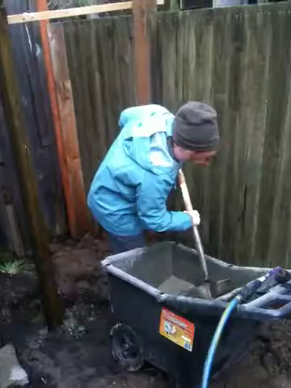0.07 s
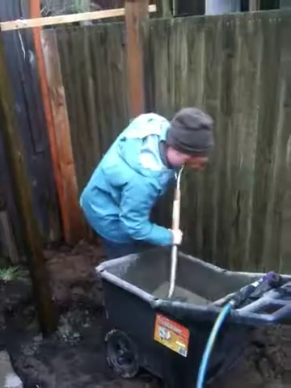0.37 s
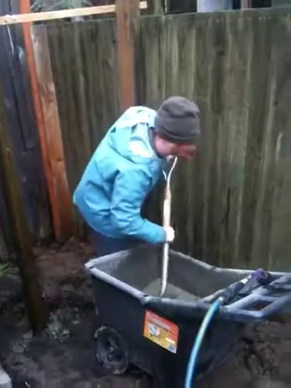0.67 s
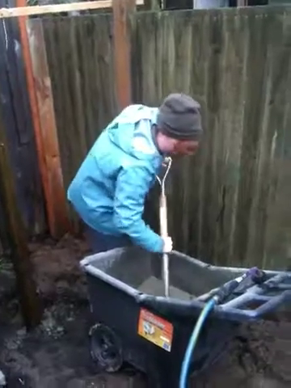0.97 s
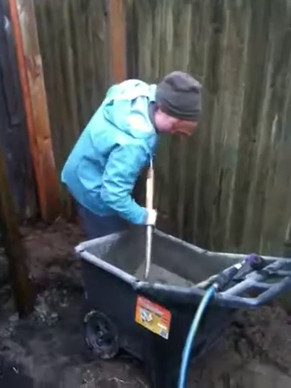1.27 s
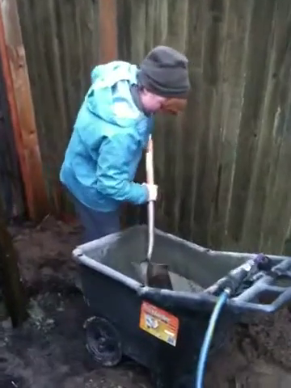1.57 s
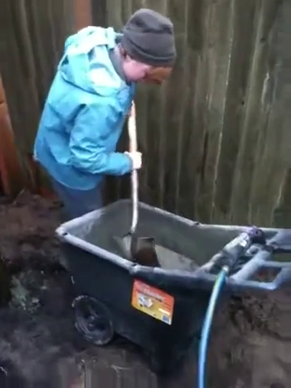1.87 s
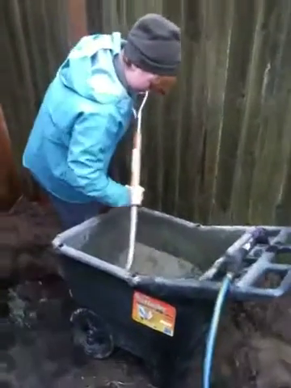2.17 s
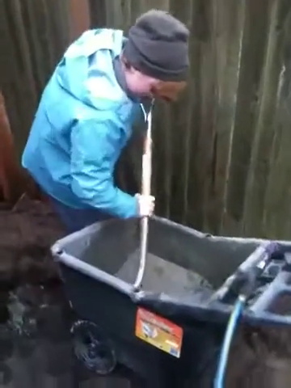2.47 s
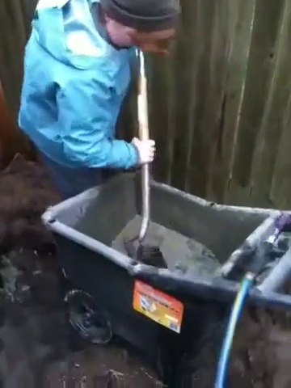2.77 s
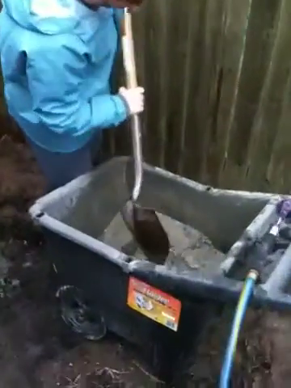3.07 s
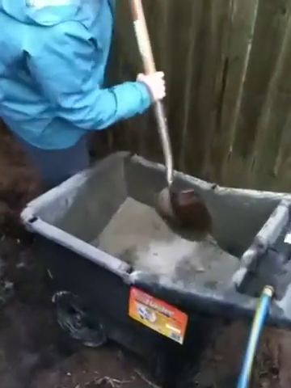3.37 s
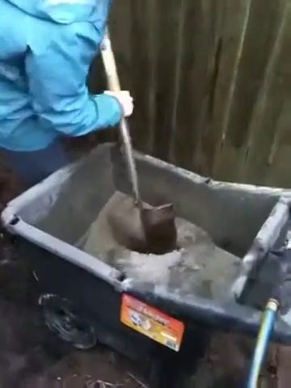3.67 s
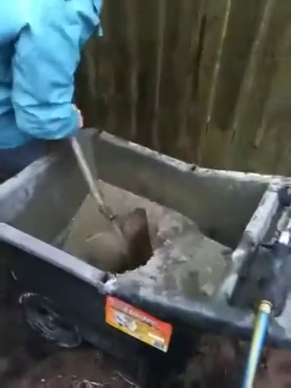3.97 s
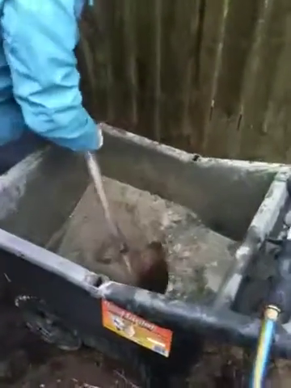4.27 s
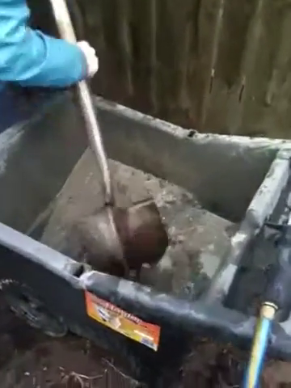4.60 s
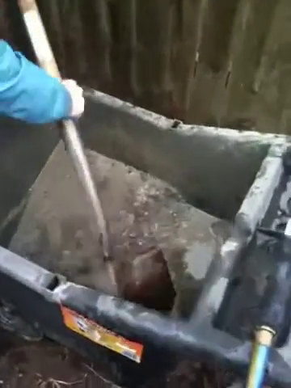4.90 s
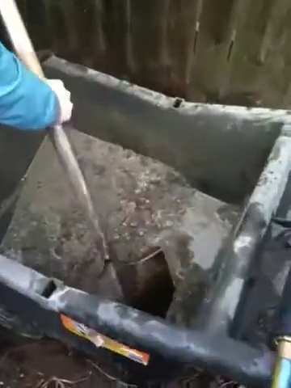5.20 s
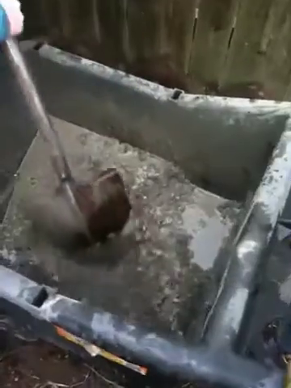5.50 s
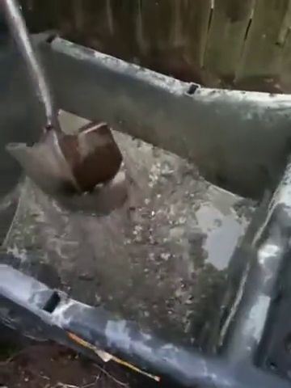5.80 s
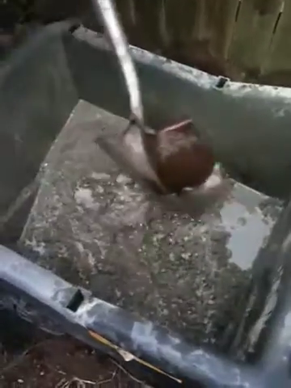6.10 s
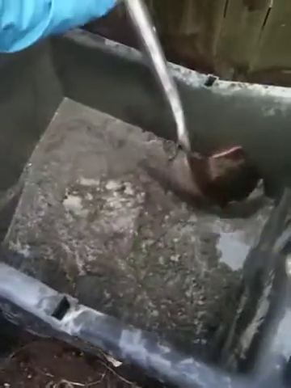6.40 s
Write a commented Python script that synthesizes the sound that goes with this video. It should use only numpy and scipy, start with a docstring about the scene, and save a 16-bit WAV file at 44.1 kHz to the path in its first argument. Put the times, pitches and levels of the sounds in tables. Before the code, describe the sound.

A steel shovel mixes wet cement in a plastic cart, heard nearby through a phone microphone over faint, steady outdoor noise. From the start, deep uneven strokes grind and hiss through sand and gravel, with stone clicks, damped steel ringing and a low tub rumble. Dull thuds come around 0.7 seconds, and tiny metal squeaks near 0.9 and 1.5 seconds. At about 2 seconds cement slides along the blade with a hollow swish, followed by more crunching scrapes until 2.7. After a lull with soft bumps, shallower, hissier strokes run from 3.3 to 4.7 seconds, separated by short gaps. At 5 seconds the blade hits the tub with a hard, rattling knock, the loudest moment, shaking sand loose. A long skimming scrape follows from 5.2 to 5.7, then a short one, and a last sharp, bright bite into gravel at 6.3 seconds.

```python
"""A steel shovel mixes wet cement in a plastic cart by a wooden fence; a phone hears it over yard noise.
First the blade works deep: sand grinds, hisses, rings the steel and rumbles in the tub. The edge bites
gravel, squeaks by stick-slip and thuds on the tub. Near 2 s cement slides along the steel with a swish.
From 3 s the strokes run shallower. At 5 s the blade knocks hard on the tub and shakes sand loose.
A long skimming stroke follows, then a last sharp bite at 6.3 s."""
import sys
import numpy as np
from scipy import signal
from scipy.fft import rfft, irfft
from scipy.io import wavfile
from scipy.ndimage import uniform_filter1d, map_coordinates

SR = 44100
rng = np.random.default_rng(int(sys.argv[2]) if len(sys.argv) > 2 else 0)


def store_wav(level_fs):
    """Save 16-bit WAV to argv[1]."""
    pcm = np.round(np.clip(np.atleast_2d(level_fs), -1, 1) * 32767)
    wavfile.write(sys.argv[1], SR, pcm.T.astype(np.int16))


N = 284445
TIME_S = np.arange(N) / SR

# shovel pushes: (start [s], push [s], release [s], blade drive [dB], sand [dB re blade], tub [dB re blade])
STROKES = [ (0.1, 0.086, .06, -46.5, -0.5, -14), (0.159, .21, 0.061, -33, -3, -14.5),
           (0.48, 0.11, 0.1, -44.5, -2, -13), (0.65, 0.13, 0.04, -41, -13, -5),
           (1.116, 0.09, 0.023, -33, -6.5, -13.5), (1.19, 0.18, 0.056, -32.5, -1.5, -13),
           (1.42, 0.12, 0.076, -39.5, -1, -20), (2.039, 0.27, 0.051, -35.5, -3.5, -3.5),
           (2.39, 0.15, 0.059, -41, -6, -8.5), (2.54, 0.1, 0.099, -34, -0.5, -12.5),
           (2.98, 0.13, 0.038, -47.5, -1.5, -20), (3.31, 0.073, .02, -59.5, 10, -16),
           (3.41, 0.038, 0.29, -35.5, 1, -12.5), (3.585, 0.11, 0.26, -34.5, -2, -17.5),
           (4.02, 0.051, 0.16, -36.5, 3.5, -10.5), (4.19, 0.15, 0.064, -36.5, -9.5, -12.5),
           (4.474, 0.16, 0.022, -35.5, -0.5, -21), (5.23, 0.39, 0.15, -34, -4, -18.5),
           (5.835, 0.094, 0.005, -36, -3.5, -33), (6.283, 0.11, 0.035, -33, -2, -17.5)]
# edge bites gravel: (peak [s], rise [s], blade drive [dB], sand [dB re blade], tub [dB re blade])
BITES = [ (0.336, 0.037, -25.5, 2.5, -20), (0.738, 0.022, -21.5, -9, -13),
         (0.947, 0.013, -24.5, -3.5, -10.5), (2.117, 0.005, -25.5, -2, -9), (2.13, 0.0076, -24, 2, -10),
         (2.316, 0.0078, -28.5, -12, -28), (2.345, .01, -26, -10, -17), (2.517, 0.024, -31.5, -2, -10),
         (2.577, 0.0093, -35.5, 1.5, 2), (3.427, 0.0037, -32.5, 5.5, -10), (3.471, 0.023, -42.5, 14.5, -7),
         (3.588, 0.0031, -32, 11.5, -11), (4.228, 0.012, -25, -5, -13.5), (4.294, 0.011, -36, 4, -4),
         (4.601, 0.009, -27, -8, -35), (5.077, 0.018, -24, 1.5, -9), (5.156, 0.0099, -37.5, 0, -20),
         (5.227, 0.02, -35, 0.5, -7), (6.291, 0.0021, -19, 4.5, -34), (6.305, 0.003, -17, 0, -17.5),
         (6.332, 0.0061, -23, -1, -18)]
# drive between pushes: (blade [dB], sand [dB], tub [dB])
REST_DRIVE_DB = (-57.5, -62, -66.5)
# blade depth in the mix: (time [s], depth [0 skimming, 1 buried])
BLADE_DEPTH = [(.3, 0.73), (1.4, 0.83), (2.65, 0.84), (3.5, 0.33), (5.6, 0.063), (6.3, 0.38)]
# blows on stone or tub: (time [s], rattle decay [s], blade drive [dB], click drive [dB], tub drive [dB])
KNOCKS = [ (0.177, 0.017, -40, -31.5, -68), (0.682, 0.022, -29, -60, -70), (0.897, 0.0068, -34, -70, -69),
          (1.524, .009, -28.5, -39, -58), (2.453, .007, -31, -38, -50), (4.463, 0.01, -33, -69, -64),
          (4.933, 0.0083, -17.5, -47, -38), (4.979, 0.02, -17, -27, -23.5), (4.992, 0.008, -14.5, -27, -24),
          (5.0135, 0.005, -19, -42, -26), (5.0335, 0.012, -22.5, -34, -24.5), (5.268, 0.014, -31, -50, -39)]
# sharp bright clicks from stones on the edge and from the hard knock: (time [s], drive [dB])
BRIGHT_CLICKS = [(.331, -21), (2.52, -21), (3.585, -22), (4.932, -24), (4.979, -7), (6.307, -8)]
# blade stick-slip: (time [s], pitch [Hz], fade [s], level [dB])
SQUEAKS = [(0.897, 3310, 0.008, -39), (0.92, 3230, .007, -29), (0.943, 2830, 0.008, -22.5),
           (1.499, 1860, .01, -33), (1.528, 1905, 0.02, -27.5), (3.05, 3240, 0.094, -47.5)]
# blade or wet lump bumps the tub: (time [s], pitch [Hz], decay [s], level [dB])
THUDS = [(.717, 305, 0.0034, -25.5), (0.768, 300, 0.0029, -25), (.945, 104, .008, -52),
         (1.273, 236, 0.0051, -39), (2.134, 137, .005, -34.5), (2.791, 294, 0.0046, -41.5),
         (2.934, 222, 0.0015, -34)]
# plastic tub modes: (frequency [Hz], level [dB], t60 [s])
TUB_MODES = [(118, -12, .25), (183, 0, .26), (259, -.5, .16), (361, -2, .3), (431, -6, .25), (549, -9, .28),
             (734, -6, .24), (838, -6, .25)]
# free steel blade modes: (frequency [Hz], level [dB], t60 [s])
BLADE_MODES = [(958, 0, .2), (1125, 0, .14), (1195, -5, .3), (1260, 0, .3), (1430, -5, .2), (1680, 3, .18),
               (2040, -6, .2), (3300, -6, .06), (4750, -4, .06)]
# broad blade resonances while scraping: (frequency [Hz], buried [dB], skimming [dB])
SCRAPE_RESONANCES = [(1052, -28, -10.5), (1440, -6.5, -17.5), (1642, -9, -11.5), (1930, -5.5, -16),
                     (2830, -10, -15), (3130, 0, -33), (4700, -28, -6.5)]
# distant outdoor noise: (frequency [Hz], level [dB])
YARD_SPECTRUM = [(25, -36), (70, -2), (130, -1), (230, 5.5), (450, -4.5), (900, -2), (2000, -9),
                 (5000, -25.5), (16000, -19)]
# tub rumble: (frequency [Hz], level [dB])
RUMBLE_SPECTRUM = [(30, 0.5), (90, -24.5), (180, 0.5), (320, -2.5), (600, -2.5), (1100, -7.5), (3000, -87)]
# blade grinding: (frequency [Hz], level [dB])
GRIND_SPECTRUM = [(200, -37.5), (550, -9), (900, 1.5), (1600, 5), (2200, -1), (3200, 0.5), (6000, -16.5)]
# sand hiss: (frequency [Hz], level [dB])
HISS_SPECTRUM = [(900, -28.5), (2000, -4), (3000, 5.5), (8000, 1.5), (16000, -9.5)]
# cement slipping on steel: (frequency [Hz], level [dB])
SWISH_SPECTRUM = [(300, -3.5), (900, -6), (1500, 1.5), (2050, 7), (3000, 5), (4200, 2), (11000, 1),
                  (16000, -1.5)]
# microphone bass roll-off and port resonances: (frequency [Hz], gain [dB])
MIC_RESPONSE = [(35, -22.5), (120, 0), (1150, -3.5), (1520, -1.5), (2080, 3.5), (2370, -5), (3200, -9.5),
                (3900, -8), (4850, -4.5), (5850, -13), (7600, -0.5), (9500, -9), (11300, -5.5),
                (12900, -15), (14200, -10.5), (16000, -23)]


def undb(db):
    """Decibels to gain."""
    return 10 ** (np.asarray(db) / 20)


def unit_rms(x):
    """Scale to rms 1."""
    return x / np.sqrt(np.mean(x ** 2))


def unit_energy(response):
    """Scale to energy 1."""
    return response / np.sqrt(np.sum(response ** 2))


def convolve(x, response):
    """Apply an impulse response."""
    return signal.fftconvolve(x, response)[:N]


def colour(spectrum, size=2048):
    """Minimum-phase impulse response of a spectrum."""
    hz, db = np.transpose(spectrum)
    bins_hz = np.maximum(np.arange(size // 2 + 1) * SR / size, 1)
    cepstrum = irfft(np.log(undb(np.interp(np.log(bins_hz), np.log(hz), db))))
    cepstrum[1:size // 2] *= 2
    cepstrum[size // 2 + 1:] = 0
    return irfft(np.exp(rfft(cepstrum)))


def shaped(x, spectrum):
    """Filter by a spectrum at unit energy."""
    return convolve(x, unit_energy(colour(spectrum)))


def walk(rate_hz):
    """Smooth random drift, spread near 1."""
    hold = max(int(SR / rate_hz), 1)
    steps = np.repeat(rng.standard_normal(N // hold + 1), hold)
    return 1.2 * uniform_filter1d(steps, hold)[:N]


def grit(per_s, spread_db):
    """Grains cracking under steel: random clicks of uneven size."""
    clicks = (rng.random(N) < per_s / SR) * np.sign(rng.standard_normal(N))
    return unit_rms(clicks * undb(spread_db * rng.standard_normal(N)))


def swell(at_s, rise_s, fall_s):
    """Force with exponential rise and fall."""
    return np.exp(-np.maximum((at_s - TIME_S) / rise_s, (TIME_S - at_s) / fall_s))


def ringing(modes, damping=1):
    """Impulse response of decaying modes."""
    t = TIME_S[:SR // 2]
    ring = 0
    for k, (hz, db, t60_s) in enumerate(modes):
        decay = np.exp(-np.log(1000) * damping * t / t60_s)
        ring += (-1) ** k * undb(db) * np.cos(2 * np.pi * hz * t) * decay
    return unit_energy(ring)


def yard(level_db=-53, wander_db=2.5):
    """Distant outdoor noise, level drifting."""
    noise = unit_rms(shaped(rng.standard_normal(N), YARD_SPECTRUM))
    return noise * undb(level_db + wander_db * walk(rate_hz=4.38))


def fence(x, t60_s=0.19, wet_db=-12, lag_s=0.0026):
    """Add scattered echoes from tub walls and fence boards."""
    t = TIME_S[:SR // 2]
    echoes = rng.standard_normal(len(t)) * (t > lag_s) * np.exp(-np.log(1000) * t / t60_s)
    return x + undb(wet_db) * convolve(x, unit_energy(echoes))


def thudding(overtone_ratio=1.505, overtone_db=-8):
    """Soft blows on the tub: two wall modes, smothered by cement within a few cycles."""
    thuds = 0
    for at_s, hz, decay_s, db in THUDS:
        age_s = np.maximum(TIME_S - at_s, 0)
        phase = 2 * np.pi * hz * age_s
        modes = np.sin(phase) + undb(overtone_db) * np.sin(overtone_ratio * phase)
        thuds += undb(db) * age_s / decay_s * np.exp(1 - age_s / decay_s) * modes
    return thuds


def squeaking(pitch_waver=0.0357):
    """Stick-slip bursts of unsteady pitch: quick catch, slower fade."""
    clock_s = np.cumsum(1 + pitch_waver * walk(rate_hz=360)) / SR
    squeaks = 0
    for at_s, hz, fade_s, db in SQUEAKS:
        envelope = np.exp(-(np.maximum(4 * (at_s - TIME_S), TIME_S - at_s) / fade_s) ** 2)
        squeaks += undb(db) * envelope * np.sin(2 * np.pi * hz * clock_s)
    return squeaks


def sliding(level_db=-28.5, at_s=1.945, rise_s=.055, fall_s=.095, sink_per_s=.3):
    """Cement slips along the steel: a hollow swish with broad, evenly spaced humps, sinking slightly."""
    dip_hz, spacing_hz = 2520, 3350
    hz = np.arange(N // 2 + 1) * SR / N
    humps = np.hypot(np.sin(np.pi * (hz - dip_hz) / spacing_hz), .1)
    swish = irfft(rfft(shaped(rng.standard_normal(N), SWISH_SPECTRUM)) * humps, N)
    age_s = TIME_S - at_s
    sinking = map_coordinates(swish, [(TIME_S - sink_per_s * age_s ** 2 / 2) * SR])
    envelope = np.exp(-(age_s / np.where(age_s < 0, rise_s, fall_s)) ** 2)
    return undb(level_db) * envelope * sinking / np.std(swish)


def knocking(blade_db=-2, click_db=4, tub_db=-1, blade_ring_db=4.5, tub_ring_db=2.5):
    """Steel hits with a short rattle; the share reaching the tub rings both tub and blade."""
    force = sum(undb(db)[:, None] * swell(at_s, 0.00048, fall_s) for at_s, fall_s, *db in KNOCKS)
    blade, click, tub = force * grit(per_s=6000, spread_db=2)
    blows = np.zeros(N)
    for at_s, fall_s, _, _, db in KNOCKS:
        blows[int(at_s * SR)] = undb(db) * np.sqrt(fall_s * SR / 2)  # energy of the tub's rattle
    clank = undb(blade_db) * shaped(blade, GRIND_SPECTRUM)
    clank += undb(blade_ring_db) * convolve(blows, ringing(BLADE_MODES))
    thump = undb(tub_db) * shaped(tub, RUMBLE_SPECTRUM)
    thump += undb(tub_ring_db) * convolve(blows, ringing(TUB_MODES))
    return clank + thump + undb(click_db) * shaped(click, HISS_SPECTRUM)


def depth():
    """Blade depth over time, 0 to 1."""
    return np.interp(TIME_S, *np.transpose(BLADE_DEPTH))


def push(start_s, length_s, release_s, attack_share=0.53):
    """Force of one stroke: build, hold, release."""
    age_s = np.maximum(TIME_S - start_s, 0)
    attack = np.sin(np.pi / 2 * np.minimum(age_s / (attack_share * length_s), 1))
    return attack * np.exp(-np.maximum(age_s - length_s, 0) / release_s)


def effort(bite_fall_s=0.011, shake_db=-11, shake_rise_s=0.00062, shake_fall_s=0.11):
    """Blade, sand and tub drives: power sum of strokes, bites and sand shaken by the hardest knock."""
    forces = [(push(*stroke[:3]), *stroke[3:]) for stroke in STROKES]
    forces += [(swell(at_s, rise_s, bite_fall_s), *db) for at_s, rise_s, *db in BITES]
    at_s, _, blade_db, click_db, tub_db = max(KNOCKS, key=lambda knock: knock[2])
    shake = swell(at_s, shake_rise_s, shake_fall_s)
    forces.append((shake, blade_db + shake_db, click_db - blade_db, tub_db - blade_db))
    power = sum((undb([db, db + sand, db + tub])[:, None] * force) ** 2 for force, db, sand, tub in forces)
    return np.sqrt(power + undb(REST_DRIVE_DB)[:, None] ** 2)


def judder():
    """The blade catches and slips: lurches growing with depth, plus fast chatter."""
    lurch_db = (1 + depth()) * walk(rate_hz=45)
    chatter_db = 1.3 * walk(rate_hz=200)
    return undb(lurch_db + chatter_db)


def ticking(drive, tick_db=2.5, highpass_hz=8500, click_rise_s=0.00027, click_fall_s=0.0058):
    """Small stones tick on the steel, louder with depth; stones and the hard knock add bright clicks."""
    ticks = undb(tick_db) * drive * np.sqrt(depth()) * grit(per_s=350, spread_db=3)
    force = sum(undb(db) * swell(at_s, click_rise_s, click_fall_s) for at_s, db in BRIGHT_CLICKS)
    clicks = force * grit(per_s=6000, spread_db=3)
    return signal.sosfilt(signal.butter(2, highpass_hz, "high", fs=SR, output="sos"), ticks + clicks)


def singing(grains, relative_width=.12, flicker_db=2, warp_s=.001):
    """Grains excite blade resonances; depth sets their balance, clinging cement shifts their pitch."""
    t = TIME_S[:SR // 20]
    buried, steel = depth(), 0
    for hz, buried_db, skimming_db in SCRAPE_RESONANCES:
        gain = undb(buried * buried_db + (1 - buried) * skimming_db + flicker_db * walk(rate_hz=30))
        resonance = t * np.exp(-np.pi * relative_width * hz * t) * np.sin(2 * np.pi * hz * t)
        band = convolve(gain * grains, unit_energy(resonance))
        steel += np.interp(TIME_S + warp_s * walk(rate_hz=12), TIME_S, band)
    return steel


def grinding(grains, ring_db=-12):
    """Each grain gives a dead crack plus blade modes damped by wet cement."""
    ring = ringing(BLADE_MODES, damping=2)
    crack = unit_energy(colour(GRIND_SPECTRUM))
    response = np.pad(crack, (0, len(ring) - len(crack))) + undb(ring_db) * ring
    return convolve(grains, unit_energy(response))


def scraping(grind_db=-5, sing_db=-1, hiss_db=3.5, pebble_db=-9):
    """Sand and pebbles under the moving blade drive steel, hiss and tub rumble."""
    blade_drive, sand_drive, tub_drive = effort() * judder()
    pebbles = undb(pebble_db) * grit(per_s=180, spread_db=2)
    grind = undb(grind_db) * grinding(blade_drive * (grit(per_s=3000, spread_db=3) + pebbles))
    coarse_grains = (grit(per_s=140, spread_db=2) + grit(per_s=2000, spread_db=3)) / np.sqrt(2)
    steel = undb(sing_db) * singing(blade_drive * coarse_grains)
    fine_grains = grit(per_s=22000, spread_db=1)
    hiss = undb(hiss_db) * shaped(sand_drive * (fine_grains + pebbles), HISS_SPECTRUM)
    rumble = shaped(tub_drive * grit(per_s=2500, spread_db=1), RUMBLE_SPECTRUM)
    return grind + steel + hiss + rumble + ticking(sand_drive)


def scene():
    """Shovel, cart and yard; mono on two channels."""
    mono = fence(scraping() + sliding() + knocking() + squeaking() + thudding()) + yard()
    return np.array([mono, mono])


def record(dry):
    """Phone: brief opening silence, microphone response, steep low-pass."""
    start_s, lowpass_hz = .119, 15900
    heard = np.array([convolve(channel * (TIME_S > start_s), colour(MIC_RESPONSE)) for channel in dry])
    return signal.sosfilt(signal.ellip(10, .2, 80, lowpass_hz, fs=SR, output="sos"), heard)


dry = scene()
out = record(dry)
store_wav(out)
```